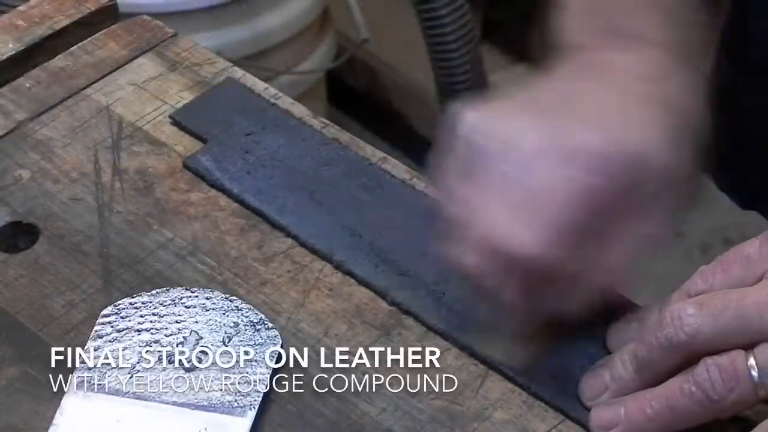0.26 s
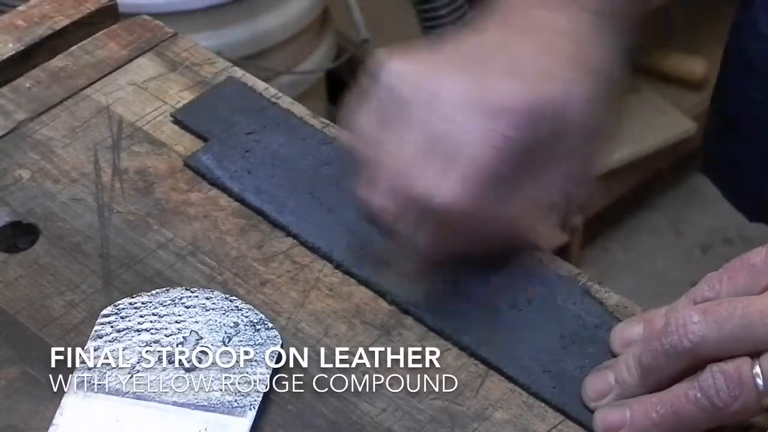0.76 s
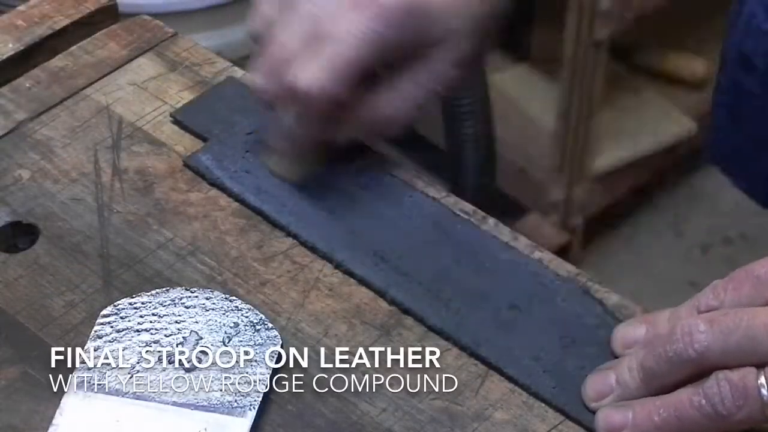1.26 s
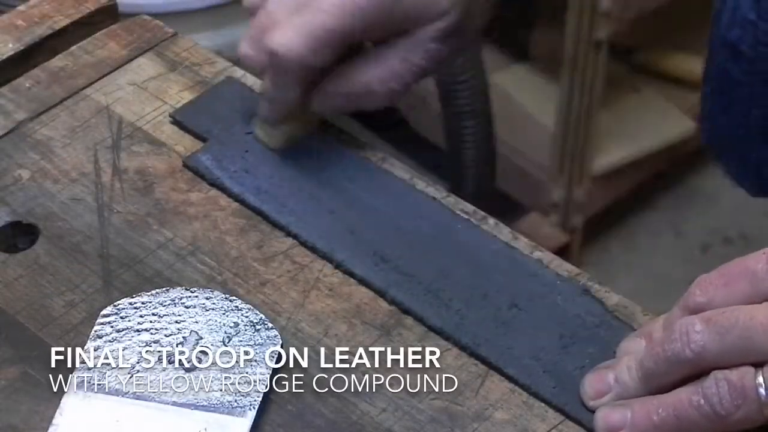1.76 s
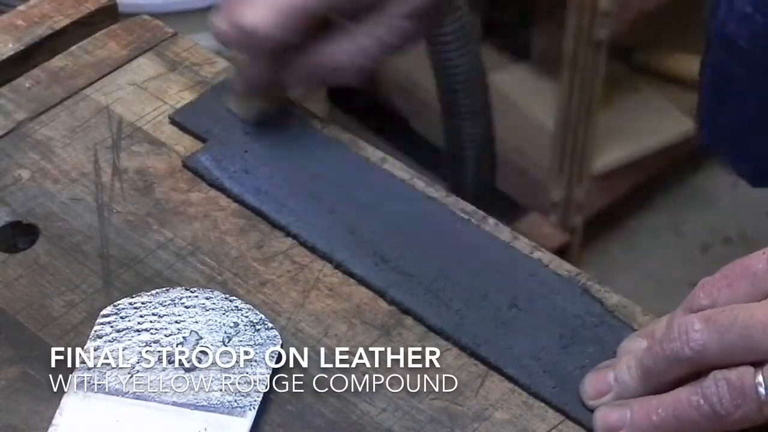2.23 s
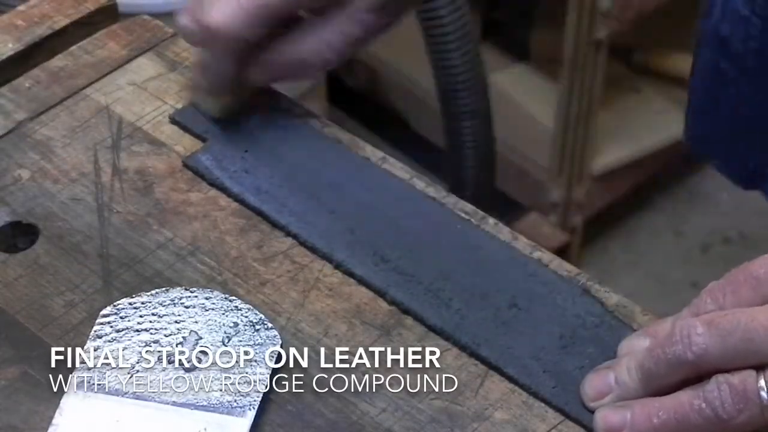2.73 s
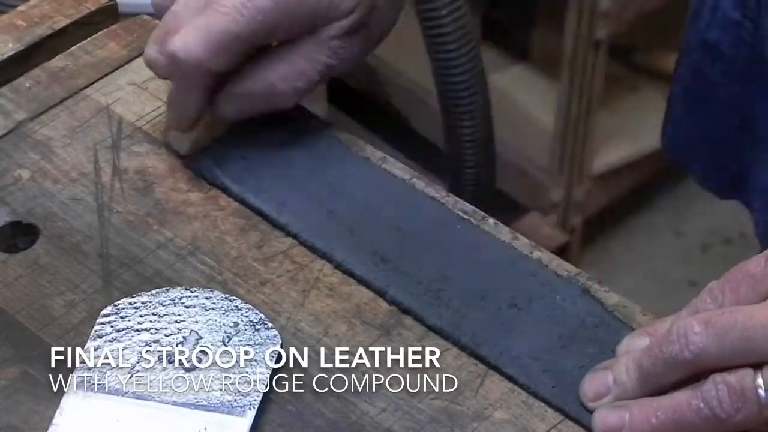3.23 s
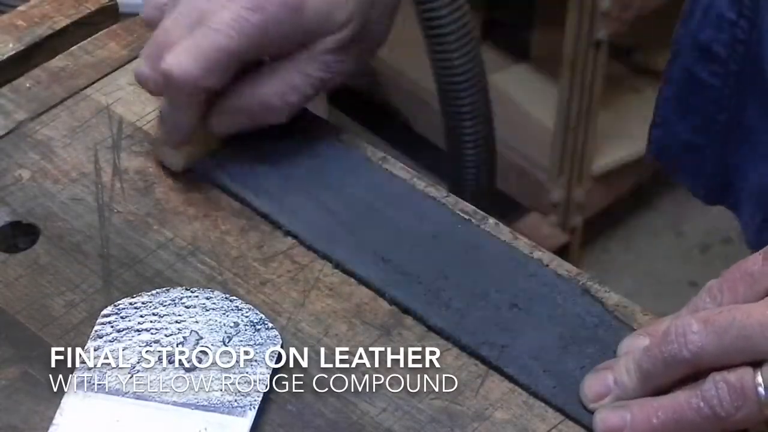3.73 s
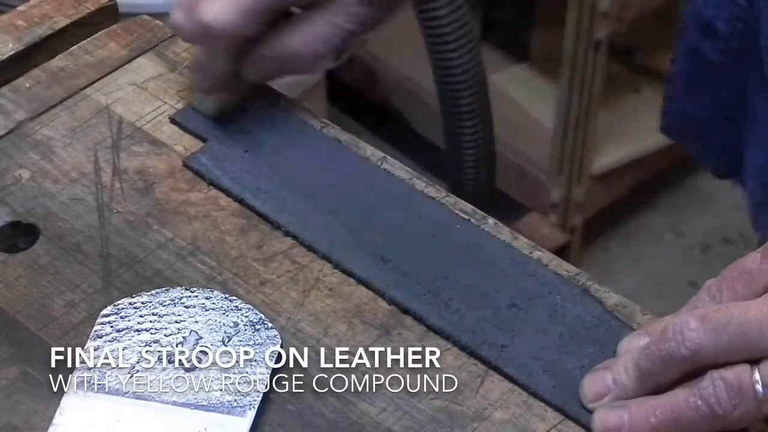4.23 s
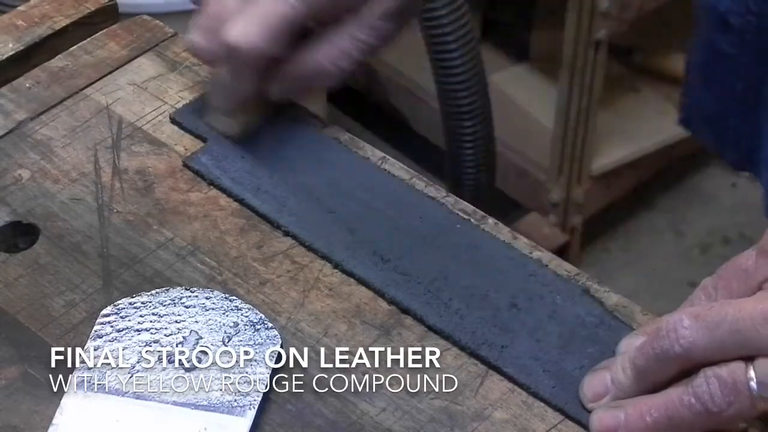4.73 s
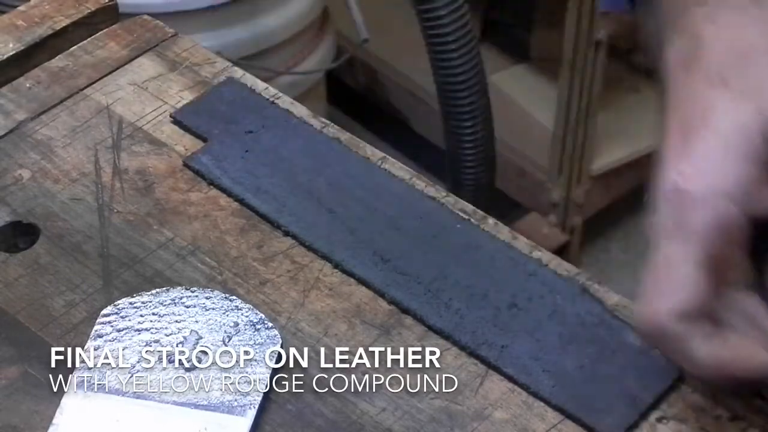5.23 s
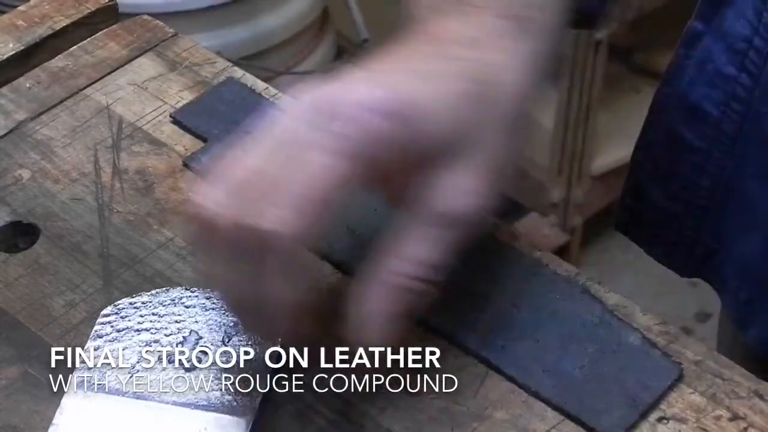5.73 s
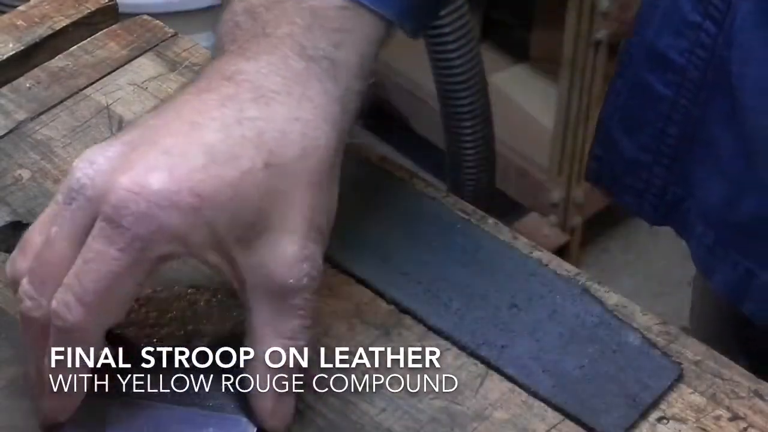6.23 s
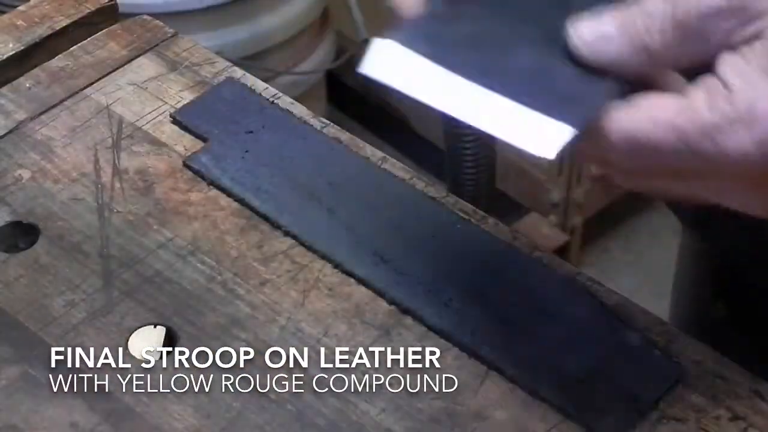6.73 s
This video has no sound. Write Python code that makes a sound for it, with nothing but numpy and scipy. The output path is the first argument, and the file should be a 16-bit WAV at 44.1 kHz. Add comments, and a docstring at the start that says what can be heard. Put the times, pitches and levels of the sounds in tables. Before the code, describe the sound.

Quick hissing strokes of compound on leather thump a wooden bench, followed by a metal blade rattling as it is set down.

```python
"""A workbench in a small workshop, a little right of the microphone; mains hum and room air throughout.
From the start, a stick of polishing compound is rubbed in quick strokes along a leather strop.
Most strokes land with a knock that rings the wooden bench, then hiss and drag over the leather.
The strokes stop just before five seconds. About a second later a plane blade clacks and rocks on
the bench as it is put down, and then only the room is left."""
import sys
import numpy as np
from scipy import signal
from scipy.fft import rfft, irfft, next_fast_len
from scipy.io import wavfile

SR = 44100
rng = np.random.default_rng(int(sys.argv[2]) if len(sys.argv) > 2 else 0)


def file_out(sig):
    """Save sig as 16-bit WAV at sys.argv[1]."""
    # one column per channel
    cols = np.atleast_2d(sig).T
    # limit, then scale
    lim = np.clip(cols, -1, 1)
    pcm = np.round(lim * 32767).astype(np.int16)
    wavfile.write(sys.argv[1], SR, pcm)


N = 307377
TIME = np.arange(N) / SR
RING_TIME = TIME[:SR // 2]

# Strokes along the strop. Each row: start and length in seconds, then in dB the relative levels of hiss,
# drag and swish, the hiss's dip at mid-stroke (negative swells) and its change from start to end.
STROP_STROKES = [ (-0.07, 0.25, -48.5, -58.5, -58.5, -2, 1), (0.184, 0.18, -43.5, -64.5, -70, -4, 0),
                 (0.354, 0.2348, -48, -58, -68, -1.5, -4), (0.724, 0.27, -51, -54.5, -56, -3, -5.5),
                 (1.126, 0.295, -48.5, -56.5, -56.5, 1.5, -4.5), (1.553, 0.29, -49, -53.5, -55, 0.5, -5),
                 (2.026, 0.31, -48.5, -60.5, -54, 4, -5), (2.504, 0.33, -50, -52.5, -57, 0.5, -6),
                 (2.996, 0.295, -51.5, -53.5, -57, -3, -4), (3.494, 0.3, -50.5, -53.5, -54.5, 1, -10.5),
                 (3.986, 0.32, -47.5, -51, -57.5, 3, -5), (4.523, 0.33, -50, -54.5, -58, 1.5, -4.5)]
# The stick knocks on the strop. Each row: time in seconds, relative thump level in dB, contact cut-off
# and low cut in Hz, relative levels of the edge tick and the grit snap in dB.
STICK_KNOCKS = [ (0.290, -47.5, 690, 61, -76, -80), (0.7099, -25.5, 3000, 60, -20.5, -50),
                (0.953, -37.5, 510, 302, -73, -80), (1.1143, -28.5, 1370, 40, -32.5, -37),
                (1.383, -45, 490, 200, -77, -80), (1.5413, -32.5, 295, 40, -30.5, -50),
                (2.015, -43.5, 394, 40, -30, -33), (2.528, -24, 895, 50, -30, -26),
                (3.0037, -22, 1980, 70, -19.5, -32), (3.255, -43, 502, 201, -68, -80),
                (3.477, -24.5, 1100, 70, -27, -46), (4.0002, -26, 1246, 40, -29.5, -29),
                (4.532, -28, 537, 70, -37.5, -39)]
# The blade hits the bench. Each row: time in seconds, relative level in dB, contact cut-off in Hz.
BLADE_CLACKS = [(5.776, -36, 2450), (5.781, -41, 2580), (5.789, -44, 2180), (5.9999, -41, 2000),
                (6.01, -48, 1000), (6.021, -43, 1400), (6.0357, -41, 3460), (6.041, -39, 3300),
                (6.087, -47, 1050), (6.12, -49.5, 925), (6.145, -49.5, 600), (6.18, -52, 504),
                (6.263, -37.5, 656), (6.386, -59, 2850)]

# Ringing modes. Each row: frequency in Hz, relative level in dB, seconds to die away by 60 dB.
BENCH_MODES = [(51, -15, .22), (71.4, -39, 0.26), (102, -30, .2), (118.4, -16.5, 0.32), (136.7, -11, 0.38),
               (164, -22, 0.44), (183.2, -20, 0.53), (204.1, -4, 0.24), (225, -7.5, 0.18),
               (317.5, -10, 0.28), (348.8, -4, 0.24), (389.8, 0.5, 0.18), (449, -13, 0.31),
               (501.3, -1, 0.18), (529.6, -11.5, 0.26), (573, -21, 0.22), (711, -4, 0.22), (734, -9, 0.22),
               (789, -6, 0.15), (808, -10, 0.12), (890, 1, 0.052), (937, -8, 0.12), (1086, -7, 0.049),
               (1117, -4.5, 0.11), (1248, 1, 0.067), (1313, -0.5, 0.043), (1500, -6.5, 0.076)]  # the bench top
EDGE_MODES = [(1900, 4, 0.099), (2074, 13, 0.079), (2240, 7, 0.078), (2332, -19, 0.15), (2516, 5, 0.13),
              (2640, -15, 0.11), (2780, 3.5, 0.17), (2859, -8, 0.083), (3060, 6.5, 0.15), (4020, 9, 0.079),
              (4750, 2, 0.084)]  # high modes set off by a hard edge
BLADE_MODES = [(193, -18, 0.29), (350, -5, 0.24), (416, 3.5, 0.091), (512, -2, 0.11), (690, 1.5, 0.079),
               (780, -4, 0.11), (990, -8, 0.11), (1165, 3.5, 0.059), (1313, -6, 0.082), (1460, -8, .14),
               (1850, -2, 0.085), (2066, -6, .11), (2280, -5, 0.058), (2524, 0.5, 0.065),
               (2980, -11, 0.075)]  # the blade lying on the bench

# Noise colours. Each row: frequency in Hz, relative level in dB.
WOOD_COLOUR = [(200, -18), (400, 15.5), (800, 3), (1100, 4), (1500, 0), (1700, -7), (2050, -2.5),
               (2500, -16), (3200, -14), (5000, -22), (9000, -15)]  # dense resonances of the bench
TICK_COLOUR = [(600, -22), (1300, -5.5), (1750, -6.5), (2050, 1.5), (2500, 2), (3100, -5.5), (4300, -6.5),
               (5500, -10), (8000, -18.5), (15000, -24)]  # the stick's hard edge
GRIT_COLOUR = [(400, -65), (1500, -7), (2800, -2), (4100, 1.5), (5000, 1.5), (6500, 1.5), (9000, 1.5),
               (13000, 2), (15800, 0)]  # fine grit in the compound
DRAG_COLOUR = [(30, -0.5), (70, 3.5), (160, 7), (270, -5), (400, 6.5), (560, -7.5), (730, -2), (1020, -15),
               (1230, 2.5), (1430, -2.5), (1700, -3.5), (2070, -4.5), (3000, -11), (7000, -10.5)]  # friction on the leather
CLACK_COLOUR = [(200, -26), (400, 1.5), (1200, -3), (2600, -2.5), (3400, -2), (5000, -15), (9000, -30)]  # steel on wood
WALL_COLOUR = [(100, 23), (500, -2), (3000, -11), (12000, 5.5)]  # the workshop's reflections
AIR_COLOUR = [(15, -50), (25, -28.5), (113, -2), (136, -10.5), (173, -15.5), (240, -23.5), (410, -9),
              (509, -15), (804, -17.5), (895, -19.5), (1410, -18), (1750, -17), (3630, -18), (6050, -18.5),
              (15500, -24.5)]  # room tone

# Likeness of the microphone's two sides. Each row: frequency in Hz, left-right correlation.
CONTACT_STEREO = [(100, 0.65), (300, 0.31), (600, 0.91), (1400, 0.91), (3100, 0.7), (7000, 0.15),
                  (15000, 0.27)]
AIR_STEREO = [(60, 0.59), (130, 0.67), (300, 0.073), (1400, 0.096), (3100, 0.028), (7000, 0.016),
              (15000, 0.16)]
# Mains hum at the microphone. Each row: time in seconds, level in dB.
HUM_LEVELS = [(0, -62), (0.6, -64), (0.75, -55), (1.6, -55), (1.9, -61), (2.45, -63), (2.65, -56),
              (5.0, -55.5), (5.05, -59.5), (6.97, -62)]


def stick_knocks(wood_db, wood_t60, rise_s, tick_t60, tail_db, tail_t60, edge_db, snap_t60):
    """Each landing of the stick thumps the bench, ticks with its hard edge and crushes grit with a snap."""
    out = np.zeros((2, N))
    for start_s, thump_db, contact_hz, low_cut_hz, tick_db, snap_db in STICK_KNOCKS:
        modes = ring(BENCH_MODES, spread_db=2.0, travel_s=0.006087, scatter=0.21)
        body = modes + from_db(wood_db) * burst(WOOD_COLOUR, wood_t60)
        body *= 1 - np.exp(-RING_TIME / rise_s)
        # a soft contact loses the highs, a glancing one the lows
        thump = cut(cut(body, contact_hz, "low"), low_cut_hz, "high")
        tick = burst(TICK_COLOUR, tick_t60) + from_db(tail_db) * burst(TICK_COLOUR, tail_t60)
        tick += from_db(edge_db) * ring(EDGE_MODES, spread_db=7.5)
        tick *= np.minimum(RING_TIME / 0.001, 1)
        snap = burst(GRIT_COLOUR, snap_t60)
        add(out, start_s, from_db(thump_db) * thump + from_db(tick_db) * tick + from_db(snap_db) * snap)
    return out


def hand(bite_s, lift_s, drag_eases_db):
    """The hand presses, sweeps and lifts: levels of hiss, drag and swish, and speed peaking mid-stroke."""
    hiss, drag, hollow, speed = np.zeros((4, N))
    for start_s, length_s, hiss_db, drag_db, swish_db, dip_db, change_db in STROP_STROKES:
        since_s = TIME - start_s
        along = np.clip(since_s / length_s, 0, 1)
        contact = np.clip(np.minimum(since_s / bite_s, (length_s - since_s) / lift_s), 0, 1)
        pace = np.sin(np.pi * along) ** 2
        hiss += contact * from_db(hiss_db - dip_db * pace ** 2 + change_db * (along - .5))
        drag += contact * from_db(drag_db - drag_eases_db * (along - .5))
        hollow += contact * np.sqrt(pace) * from_db(swish_db)
        speed += pace
    return hiss, drag, hollow, speed


def rubbing(hiss_level, drag_level, hiss_gain_db, drag_gain_db, bench_db, grain_db, judder_db,
            echo_db, echo_s, wander_s):
    """Fine grit hisses; under pressure the stick also judders on the leather and shakes the bench."""
    hiss = noise(GRIT_COLOUR, CONTACT_STEREO) * hiss_level * from_db(hiss_gain_db + grain_db * drift(900))
    friction = drag_level * from_db(judder_db * drift(110))
    rub = hiss + noise(DRAG_COLOUR, CONTACT_STEREO) * friction * from_db(drag_gain_db)
    # a near reflection shifts as the hand travels and makes the rub sound hollow
    lag_s = echo_s + wander_s * drift(5)
    echo = np.array([np.interp(TIME - lag_s, TIME, side) for side in rub])
    bench = cut(ring(BENCH_MODES, spread_db=2), 150, "high")
    shaken = signal.fftconvolve(friction * rng.standard_normal(N), bench / np.linalg.norm(bench))[:N]
    return rub + from_db(echo_db) * echo + from_db(bench_db) * shaken


def swish(level, speed, gain_db, slow_hz, fast_hz, width_hz, wander):
    """A hollow band of friction noise rises and falls in pitch with the hand's speed."""
    centre_hz = (slow_hz + (fast_hz - slow_hz) * speed) * (1 + wander * drift(14))
    low_noise = cut(rng.standard_normal(N), width_hz / 2, "low")
    band = rms_one(low_noise * np.sin(2 * np.pi * np.cumsum(centre_hz) / SR))
    return band * level * from_db(gain_db)


def blade_clacks(crack_db, crack_t60, rattle_db, rattle_t60):
    """Steel rocks on wood: a short crack, a dry ring and a dense rattle, dulled by softer contacts."""
    out = np.zeros((2, N))
    for start_s, level_db, contact_hz in BLADE_CLACKS:
        crack = from_db(crack_db) * burst(CLACK_COLOUR, crack_t60)
        rattle = from_db(rattle_db) * burst(CLACK_COLOUR, rattle_t60)
        clack = crack + rattle + ring(BLADE_MODES, spread_db=1.0)
        add(out, start_s, from_db(level_db) * cut(clack, contact_hz, "low", order=4))
    return out


def workshop(direct, wet_db, t60, first_s):
    """The direct sound, then short, diffuse reflections off the walls, boomy with a bright top."""
    tail = burst(WALL_COLOUR, t60) * np.clip(RING_TIME / first_s - 1, 0, 1)
    tail /= np.sqrt(np.sum(tail ** 2) / 2)
    return direct + from_db(wet_db) * signal.fftconvolve(direct, tail, axes=1)[:, :N]


def mains_hum(mains_hz, lower_hz, lower_db, waver_db):
    """A wavering mains hum fills the room and beats against a weaker tone just below it."""
    hum_db = np.interp(TIME, *np.transpose(HUM_LEVELS))
    mains = from_db(hum_db + waver_db * drift(5.5))
    mains *= np.sin(2 * np.pi * mains_hz * TIME + 0.75 * drift(2.4))
    lower = from_db(lower_db + waver_db * drift(2.18))
    lower *= np.sin(2 * np.pi * lower_hz * TIME + 0.37 * drift(2.8))
    return np.sqrt(2) * (mains + lower)


def room_air(level_db):
    """Steady room tone all around the microphone: a low rumble under a wide, faint hiss."""
    return from_db(level_db) * noise(AIR_COLOUR, AIR_STEREO)


def ring(modes, spread_db, travel_s=0, scatter=1):
    """A body's answer to a blow; each spot excites the modes a little differently."""
    hz, db, t60 = np.transpose(modes)
    height = from_db(db + spread_db * rng.standard_normal(len(hz)))
    # with little scatter, the modes swing roughly together once the wave has crossed the body
    turns = hz[:, None] * (RING_TIME - travel_s) + scatter * rng.standard_normal((len(hz), 1))
    return height @ (np.sin(2 * np.pi * turns) * decay(t60[:, None])) / np.sqrt(np.sum(height ** 2) / 2)


def burst(colour, t60):
    """A short dying noise: resonances too close to tell apart."""
    return noise(colour, CONTACT_STEREO, size=len(RING_TIME)) * decay(t60)


def noise(colour, likeness, size=N):
    """Coloured stereo noise of unit power, partly shared by both sides."""
    length = next_fast_len(size)
    hz = np.arange(length // 2 + 1) * SR / length
    mid, side = rfft(rng.standard_normal((2, length)))
    alike = np.clip(at_hz(likeness, hz), -1, 1)
    both = np.sqrt(1 + alike) * mid + np.sqrt(1 - alike) * side * [[1], [-1]]
    return rms_one(irfft(both * from_db(at_hz(colour, hz)), length)[:, :size])


def from_right(x, lag_samples):
    """A sound from the right reaches the microphone's left side slightly later."""
    return np.array([np.pad(x[0], (lag_samples, 0))[:N], x[1]])


def drift(rate):
    """A random curve that glides to a new value `rate` times a second."""
    knots = rng.standard_normal(N // 16)
    return np.interp(TIME * rate, np.arange(len(knots)), knots)


def decay(t60):
    """A fall of 60 dB every t60 seconds."""
    return np.exp(-np.log(1000) * RING_TIME / t60)


def cut(x, hz, kind, order=2):
    """Low- or high-pass."""
    return signal.sosfilt(signal.butter(order, np.clip(hz, 10, SR / 3), kind, fs=SR, output="sos"), x)


def add(out, start_s, sound):
    """Mix a sound in at a time."""
    start = round(start_s * SR)
    out[:, start:start + len(RING_TIME)] += sound[:, :N - start]


def at_hz(points, hz):
    """Read a table on a log-frequency axis."""
    points = np.array(points)
    return np.interp(np.log(hz + 1), np.log(points[:, 0]), points[:, 1])


def from_db(db):
    """Decibels to gain."""
    return 10 ** (np.asarray(db) / 20)


def rms_one(x):
    """Scale to unit power."""
    return x / np.sqrt(np.mean(x ** 2) + 1e-20)


def scene():
    """Knocks, strokes and clacks at the bench, just right of the microphone, with the room behind."""
    knocks = stick_knocks(wood_db=-3, wood_t60=0.2, rise_s=0.0016, tick_t60=0.02,
                          tail_db=-14.5, tail_t60=0.17, edge_db=-13, snap_t60=0.0063)
    knocks = workshop(knocks, wet_db=-19.0, t60=0.4, first_s=0.0034)
    hiss_level, drag_level, swish_level, speed = hand(bite_s=0.071, lift_s=0.063, drag_eases_db=9)
    strokes = rubbing(hiss_level, drag_level, hiss_gain_db=4.5, drag_gain_db=2.5, bench_db=-0.5,
                      grain_db=1.0, judder_db=1.5, echo_db=-8.0, echo_s=.0018, wander_s=0.000173)
    strokes += swish(swish_level, speed, gain_db=-2, slow_hz=1105, fast_hz=1957, width_hz=1060, wander=0.08)
    clacks = blade_clacks(crack_db=5.0, crack_t60=0.011, rattle_db=-8.5, rattle_t60=0.17)
    clacks = workshop(clacks, wet_db=-21, t60=0.1, first_s=0.0061)
    bench = from_right(knocks, lag_samples=1) + strokes + from_right(clacks, lag_samples=3)
    room = room_air(level_db=-53.5) + mains_hum(mains_hz=119.4, lower_hz=99.4, lower_db=-67.0, waver_db=3.0)
    return bench * from_db([[-.3], [.3]]) + room


def record(dry):
    """The top is cut steeply above 15.82 kHz."""
    return signal.sosfilt(signal.ellip(12, .1, 70, 15820, fs=SR, output="sos"), dry)


dry = scene()
out = record(dry)
file_out(out)
```